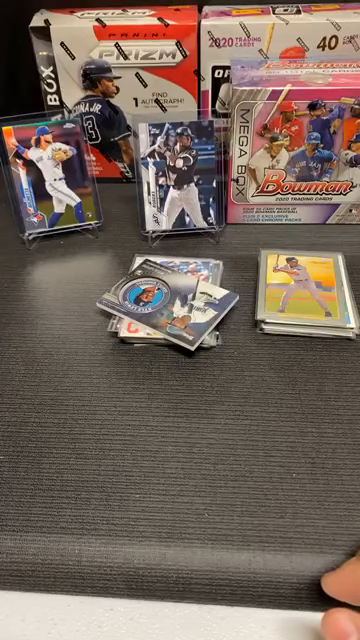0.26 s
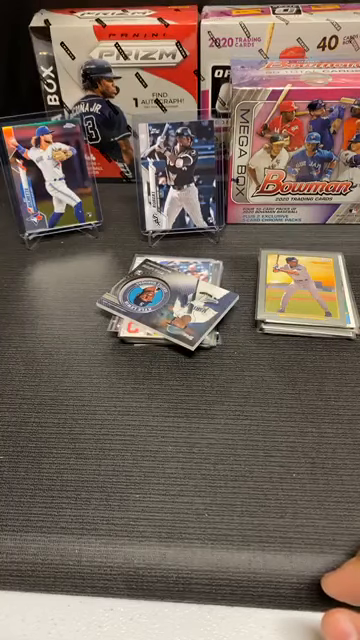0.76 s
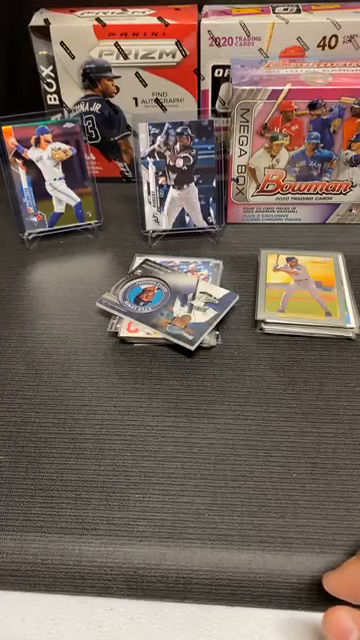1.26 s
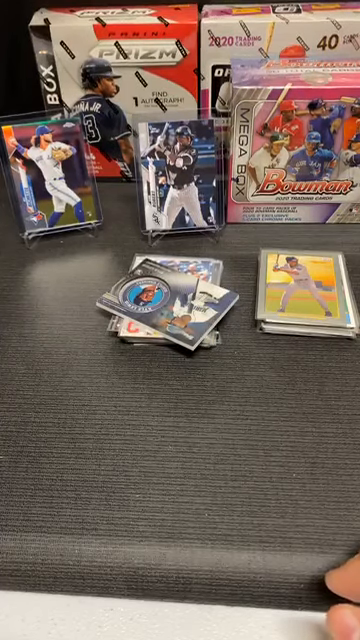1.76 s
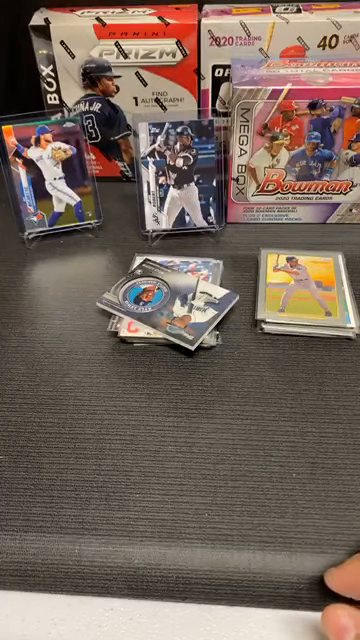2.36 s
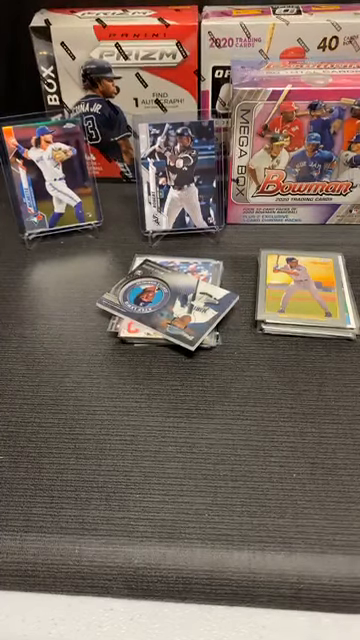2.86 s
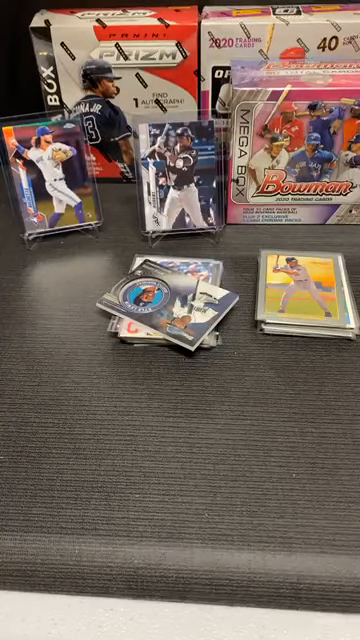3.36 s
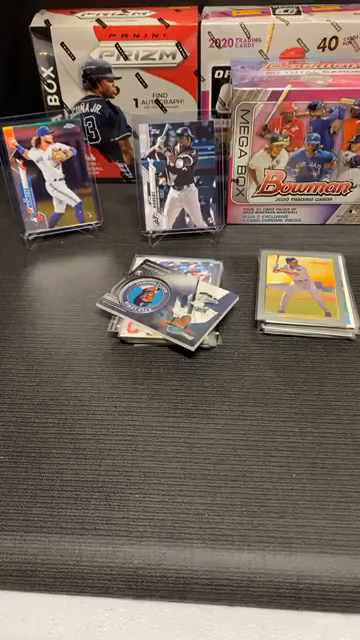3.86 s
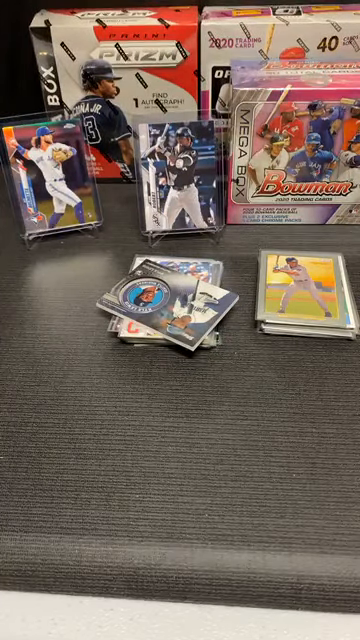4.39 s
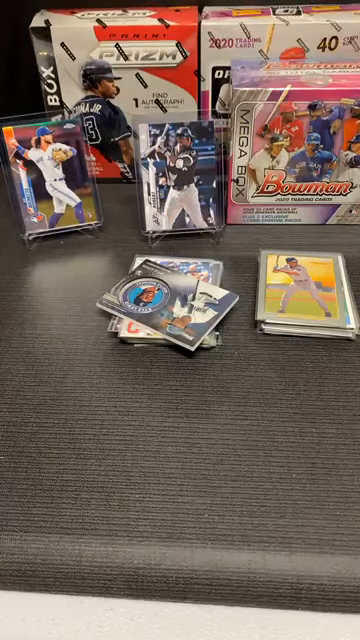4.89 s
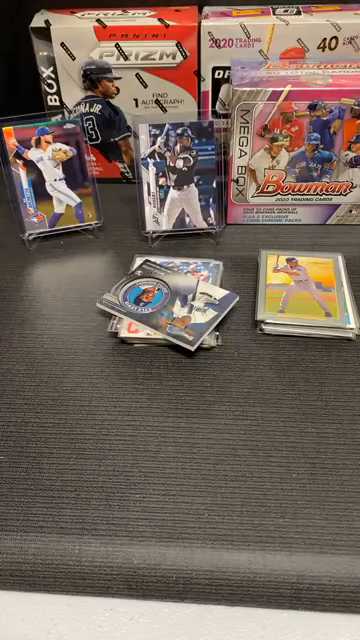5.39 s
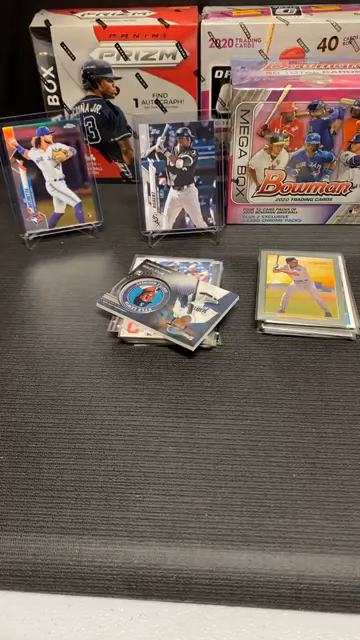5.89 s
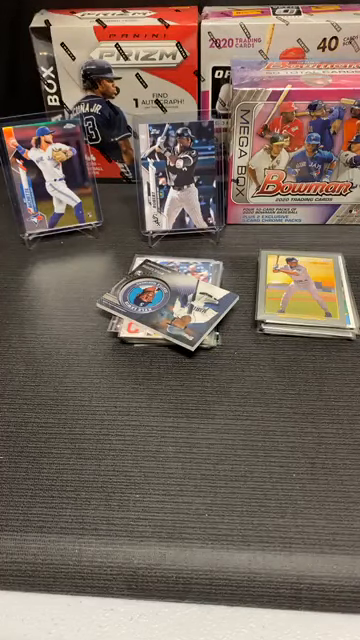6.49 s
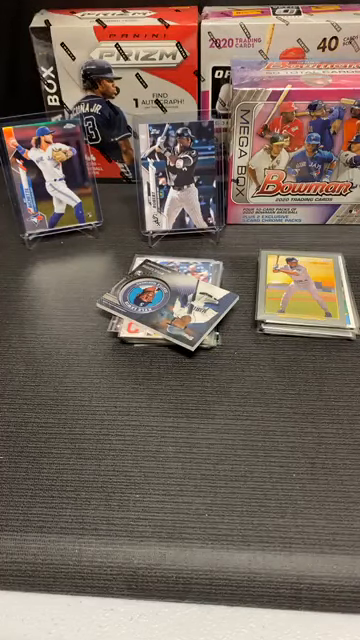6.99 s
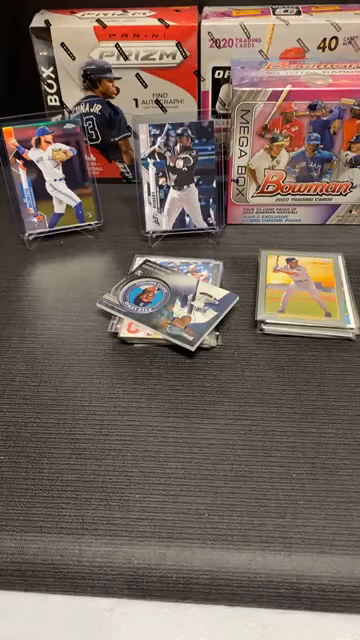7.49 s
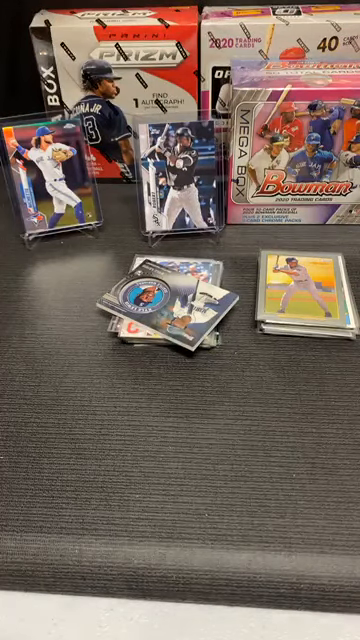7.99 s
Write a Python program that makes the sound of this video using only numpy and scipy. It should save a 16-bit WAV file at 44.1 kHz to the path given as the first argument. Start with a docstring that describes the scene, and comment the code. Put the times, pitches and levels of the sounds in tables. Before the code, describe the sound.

A small quiet room with a faint, bass-heavy hush and very short reflections, heard close. Almost immediately, at 0.07 s, a pack slaps onto the table: a sharp, bright clatter with a dull knock, dying quickly. Faint film hiss follows, and from 0.8 to 1.4 s something is shoved in short raspy, hollow scrapes with soft knocks. From about 1.5 to 2.9 s it is nearly silent, only tiny dry ticks and a soft low bump at 2.3. Around 3 s thin plastic starts rustling in short airy strokes. At 4.1 to 4.3 s comes the strongest crinkling, a dense run of bright snaps. Softer rubbing and crackles continue until a second cluster at 5.5 to 5.6 s, with a brief buzzy pop. Gentle sliding and scattered light snaps last to about 7.2 s, then a low bump at 7.4 and faint ticks fade away.

```python
"""Card into a plastic sleeve

Hands work a trading card into a thin plastic sleeve, at a table in a small quiet room.
The film rustles in filtered noise as it slides; its creases snap as short resonant pulses, singly and in runs.
Early on a pack slaps down as a burst of noise and something scrapes over the table; soft knocks ring its modes.
Short echoes of the room follow, well below the direct sound, and a low hush lies under everything."""
import sys
import numpy as np
from scipy import signal
from scipy.fft import rfft, irfft, next_fast_len
from scipy.io import wavfile
from scipy.ndimage import map_coordinates

SR = 44100
rng = np.random.default_rng(int(sys.argv[2]) if len(sys.argv) > 2 else 0)


def to_wav(sig):
    """Store sig (one row per channel, or 1-D mono) as 16-bit WAV at the path in sys.argv[1].

    Samples outside -1..1 are clipped; the rate is SR.
    """
    pcm = np.clip(np.atleast_2d(sig), -1, 1) * 32767
    pcm = np.round(pcm).astype(np.int16)
    wavfile.write(sys.argv[1], SR, pcm.T)  # frames by channels


N = 363825

# strokes of film over card and fingers:
# (start [s], length [s], relative treble sheen [dB], relative midrange rub [dB])
FILM_STROKES = [(0.0, 0.0076, -35.5, -44.5), (0.066, 0.032, -30, -35.5), (0.3, 0.061, -49, -61),
                (0.345, 0.063, -46.5, -55.5), (0.5, 0.25, -52, -67.5), (0.81, .1, -52.5, -59),
                (0.97, 0.088, -54.5, -51), (1.29, 0.16, -53, -50), (1.925, 0.043, -58.5, -65),
                (2.255, 0.039, -56.5, -64), (2.435, 0.037, -57, -62), (2.535, 0.046, -58.5, -69),
                (2.655, 0.026, -58.5, -81), (2.74, 0.067, -61.5, -80), (2.952, 0.014, -55, -57),
                (3.105, 0.092, -48, -56.5), (3.26, 0.073, -55, -62), (3.385, 0.089, -48, -52.5),
                (3.55, 0.097, -54.5, -60), (3.74, 0.055, -46, -59), (3.925, 0.0091, -40.5, -42.5),
                (3.97, 0.13, -49, -54.5), (4.085, 0.043, -43, -37.5), (4.228, 0.071, -44, -42.5),
                (4.33, 0.14, -65, -51.5), (4.445, 0.21, -45.5, -44), (4.71, 0.11, -51.5, -54),
                (4.92, 0.29, -47.5, -49.5), (5.22, 0.098, -63, -55.5), (5.355, 0.11, -49, -49),
                (5.555, 0.024, -42, -40.5), (5.77, 0.29, -56, -63.5), (6.015, 0.071, -43, -51),
                (6.15, 0.14, -46.5, -54), (6.4, .26, -47.5, -51), (6.82, 0.25, -53, -55.5),
                (7.12, 0.21, -63.5, -56), (7.365, .04, -52, -50.5), (7.625, 0.015, -56.5, -63),
                (7.79, 0.064, -61, -58.5), (8.1, 0.039, -57.5, -67)]
STROKE_ATTACK_S, STROKE_RELEASE_T60_S, STROKE_SAG_DB_PER_S = 0.0092, 0.22, 7.5
# faint rustle of the hands, rising and falling: (time [s], relative level [dB])
HAND_FIDGET = [(0, -59.5), (1.4, -58), (1.7, -67), (2.1, -73), (2.9, -66.5), (3.2, -57.5), (5.0, -53),
               (5.7, -57.5), (7.3, -57.5), (7.5, -67.5), (8.25, -60)]
FIDGET_RUB_DB = -4  # its midrange against its treble


def sliding():
    """Gains of the sheen and of the rub: strokes on top of a faint fidgeting that rises and falls."""
    sheen, rub = moves(FILM_STROKES, STROKE_ATTACK_S, STROKE_RELEASE_T60_S, STROKE_SAG_DB_PER_S)
    fidget, = curves(HAND_FIDGET)
    return np.hypot(sheen, amp(fidget)), np.hypot(rub, amp(fidget + FIDGET_RUB_DB))


# treble of the sliding film: (frequency [Hz], relative level [dB])
FILM_SHEEN = [(900, -40.5), (2000, -22), (3300, -2), (5000, 2.5), (7500, 4), (9500, -5), (12000, -11.5),
              (15500, -20)]
# midrange of fingers rubbing the film: (frequency [Hz], relative level [dB])
FINGER_RUB = [(90, -20), (200, -11.5), (380, -0.5), (800, -0.5), (1500, -3.5), (2300, -2.5), (3500, -8),
              (7000, -27.5)]
# extra top over the sheen: (time [s], relative level [dB])
TOP_AIR = [(0, -8), (0.4, -5), (1.0, -13), (2.0, -4), (3.1, -2.5), (4.0, -4), (4.4, -9), (5.0, -8),
           (6.7, -12), (7.3, -16), (7.65, -1), (7.85, -11)]
# brisker sliding hisses higher: dB of extra top per dB of sheen gain above BRISK_DB
AIR_GROWS, BRISK_DB = 0.22, -50.5


def rustle(sheen, rub, sheen_db, rub_db, air_db, slip_db, crackle_db, flutter_db):
    """Sliding film: a smooth hiss with slips and fine crackles on top, under an unsteady grip."""
    slipping = amp(slip_db) * slips(rate=500, spread_db=-0.5, life=0.0028)
    crackling = amp(crackle_db) * crackles(rate=1200, spread_db=3.5, centre_hz=3800, scatter=0.791, cycles=9.4)
    grain = slipping + crackling

    def friction(spectrum):
        """Hiss and grain through one spectrum, with its own flutter of level."""
        grip = amp(flutter_db * wobble(70))
        return grip * coloured(rng.standard_normal(N) + grain, spectrum)

    briskness_db = 20 * np.log10(sheen) - BRISK_DB
    air = curves(TOP_AIR)[0] + AIR_GROWS * briskness_db
    top = friction([(5000, -28.5), (9000, -3), (12000, -6.5), (15500, -9.5)])
    bright = friction(FILM_SHEEN) + amp(air + air_db) * top
    return amp(sheen_db) * sheen * bright + amp(rub_db) * rub * friction(FINGER_RUB)


# a crease running along the film, snap after snap:
# (start [s], length [s], gap between snaps [s], central relative level [dB], central pitch [Hz])
CREASE_RUNS = [(4.1143, .026, .0047, -13, 5170), (4.2476, .041, .0063, -23, 5800)]
# from snap to snap: share of the gap, dB, share of the pitch
RUN_JITTER, RUN_SCATTER_DB, RUN_PITCH_SCATTER = .18, 4.5, 0.084


def run_snaps():
    """Creases of a run snap at a slightly uneven pace: rows like those of single snaps."""
    rows = []
    for start, length, gap, db, hz in CREASE_RUNS:
        for k, (late, louder, higher) in enumerate(rng.standard_normal(size=(16, 3))):
            if k * gap < length:
                s = start + gap * (k + RUN_JITTER * late * (k > 0))  # the first is on time
                pitch = hz * np.exp(RUN_PITCH_SCATTER * higher)
                rows.append((s, db + RUN_SCATTER_DB * louder, pitch))
    return rows


# single creases snapping through: (time [s], relative level [dB], pitch of the buckling facet [Hz])
CREASE_SNAPS = [(0.0701, -13, 5040), (0.355, -41, 2510), (0.5054, -36.5, 6460), (0.6706, -37, 6760),
                (0.7313, -35, 3650), (1.46, -34, 7200), (1.586, -41, 3800), (1.842, -44, 7750),
                (2.3033, -41.5, 6140), (2.4479, -37, 6540), (2.57, -44, 5200), (2.962, -42, 2640),
                (3.0531, -36, 5000), (3.2025, -38, 6050), (3.2734, -36.5, 2840), (3.4019, -32.5, 6650),
                (3.5625, -38.5, 2370), (3.6005, -41, 2000), (3.9344, -24, 7800), (4.0895, -11, 4800),
                (4.093, -11.5, 5870), (4.0975, -9, 4700), (4.1066, -9.5, 4340), (4.2043, -22.5, 5800),
                (4.2389, -18.5, 4500), (4.2419, -13.5, 5300), (4.3024, -19, 5800), (4.3135, -18.5, 5800),
                (4.3548, -29, 2170), (4.4509, -32.5, 2800), (4.5743, -31, 2900), (4.644, -30.5, 4830),
                (4.7207, -32, 2000), (5.498, -25, 3580), (5.5165, -19, 2860), (5.5383, -20.5, 5400),
                (5.548, -15, 5300), (5.5651, -14.5, 4600), (5.5791, -25, 1470), (5.5909, -21, 1240),
                (5.6745, -41, 1400), (5.7166, -38.5, 1480), (5.7918, -36, 6540), (6.1426, -28.5, 3800),
                (6.2713, -30, 4560), (6.2788, -33, 3300), (6.3676, -36.5, 5150), (6.4134, -30.5, 3800),
                (6.4924, -30, 3160), (6.6045, -30.5, 4200), (6.8234, -33.5, 3800), (6.8849, -37.5, 5970),
                (7.0449, -29.5, 11000), (7.634, -40.5, 9900)]
# harder snaps are drier: t60 of the crack at a middling level, and the rise in level that halves it
CRACK_T60_S, MIDDLING_DB, HALVING_DB = 0.011, -25, 18.5


def snaps(flip_db, crack_db, skirt_db, shiver_db, shiver_t60, cut_share):
    """A facet flips with a short resonant pulse; the jolt crackles on through the film."""
    out, t = np.zeros(N), np.arange(SR // 20) / SR
    click = 1. * (t == 0)

    def per_ms(x):
        """Scale so that all the energy, packed into 1 ms, has rms 1."""
        return x * np.sqrt(SR / 1000 / np.sum(x ** 2))

    for s, db, hz in [*CREASE_SNAPS, *run_snaps()]:
        t60 = CRACK_T60_S * .5 ** ((db - MIDDLING_DB) / HALVING_DB)
        flip = filtered(click, lambda f: resonance(f, hz, q=1.1) * resonance(f, .85 * hz, q=1.3))
        onset = 1 - np.exp(-t * hz)
        decay = fade(t, t60) + amp(shiver_db) * fade(t, shiver_t60)
        jolt = rng.standard_normal(len(t)) * onset * decay
        # the crackle centres on the facet's pitch, with a weak, wide skirt
        crack = filtered(jolt, lambda f: resonance(f, hz, q=.7) ** 2 + amp(skirt_db) * resonance(f, hz, q=.08))
        snap = amp(db + flip_db) * per_ms(flip) + amp(db + crack_db) * per_ms(crack)
        # so small a facet radiates little far below its pitch
        add(out, s, filtered(snap, lambda f: low_cut(f, hz=cut_share * hz)))
    return out


# stray ticks of the film: (frequency [Hz], relative level [dB])
TICK_SPECTRUM = [(600, -16), (1500, -4), (3000, -2.5), (7000, -0.5), (10000, -9), (15500, -13)]


def ticks(sheen, rub, db, press_db, follow):
    """Stray creases give way with tiny dry clicks, even under a light touch; duller ones under the fingers."""
    free = coloured(slips(rate=42, spread_db=2.0, life=0.0076), TICK_SPECTRUM)
    dull = [(300, -14), (900, -3), (2000, -1), (3500, -3), (8000, -19.5)]
    pressed = coloured(slips(rate=40, spread_db=2.5, life=0.012), dull)
    # with follow below 1, free ticks fade less than the sheen does
    return amp(db) * sheen ** follow * free + amp(press_db) * rub * pressed


def pop_open(s, db, hz, q, t60):
    """The mouth of the sleeve springs open and its wall buzzes briefly."""
    out, t = np.zeros(N), np.arange(SR // 10) / SR
    decay = fade(t, t60 / 10) + amp(-23.0) * fade(t, t60)
    shake = rng.standard_normal(len(t)) * decay
    buzz = filtered(shake, lambda f: resonance(f, hz, q) ** 2)
    add(out, s, amp(db) * buzz / np.std(buzz[:SR // 200]))  # level over the first 5 ms
    return out


def squeak(s, length, db, hz, q):
    """Film dragged tight over the card sings briefly in a narrow band."""
    out, t = np.zeros(N), np.arange(SR // 5) / SR
    tone = unit(filtered(rng.standard_normal(len(t)), lambda f: resonance(f, hz, q) ** 2))
    swell = np.sin(np.pi * np.minimum(t / length, 1))
    add(out, s, amp(db) * tone * swell)
    return out


# the pack landing on the table: (frequency [Hz], relative level [dB])
SLAP_SPECTRUM = [(150, -17), (300, -4), (1000, -24), (1700, -4), (2300, 3), (3400, 2), (4100, -14.5),
                 (5700, 5.5), (7700, -2), (9800, -3), (11000, -13.5), (15500, -10)]


def slap(s, db, t60):
    """A pack of cards lands flat: a sharp onset and a dense, quickly dying clatter."""
    out, t = np.zeros(N), np.arange(SR // 5) / SR
    clatter = coloured(rng.standard_normal(len(t)), SLAP_SPECTRUM)
    add(out, s, amp(db) * clatter * fade(t, t60))
    return out


# blows on the table: (time [s], relative level [dB], contact brightness [Hz], t60 of the contact [s])
TABLE_KNOCKS = [(0.071, -26, 550, 0.045), (0.112, -36, 800, 0.16), (0.833, -39, 1500, 0.069),
                (1.032, -38.5, 1800, 0.057), (1.059, -39.5, 1800, 0.032), (1.145, -45.5, 1100, 0.12),
                (1.305, -43.5, 800, 0.2), (3.441, -42, 2200, 0.04), (4.096, -39, 2000, 0.047),
                (4.225, -46.5, 600, 0.025), (5.568, -44.5, 700, 0.065), (7.395, -47, 280, 0.03),
                (7.736, -50.5, 1700, 0.08)]
# soft, low bumps of hand and table: (time [s], relative level [dB], pitch [Hz], t60 [s])
LOW_BUMPS = [(2.305, -46.5, 113, 0.14), (7.396, -40, 280, 0.022), (7.406, -52, 66, 0.31)]
# shoves of something over the table:
# (start [s], length [s], relative hollow body [dB], relative rasp [dB])
TABLE_SHOVES = [(0.78, 0.043, -55, -50.5), (0.83, 0.029, -45.5, -51), (0.88, 0.38, -59, -55),
                (1.02, 0.049, -43.5, -41), (1.14, 0.19, -59, -71), (1.275, 0.15, -42.5, -49)]
SHOVE_ATTACK_S, SHOVE_RELEASE_T60_S, SHOVE_SAG_DB_PER_S = 0.02, 0.11, 12
# rasp of the dragged edge: (frequency [Hz], relative level [dB])
EDGE_RASP = [(700, -11), (1150, -4), (1390, 8.5), (1700, -10), (2350, -3), (2850, -20), (4000, -18),
             (8000, -38)]


def table(knock_db, bump_db, drag_db, rasp_db):
    """Knocks and a juddering drag ring the table top; soft contacts reach mostly its low modes."""
    out, t = np.zeros(N), np.arange(SR // 4) / SR
    for s, db, hz, t60 in TABLE_KNOCKS:
        contact = rng.standard_normal(len(t)) * fade(t, t60)
        blow = filtered(contact, lambda f: table_top(f) * low_cut(f, hz=153) / (1 + 1j * f / hz) ** 2)
        add(out, s, amp(db + knock_db) * blow / np.std(blow[:SR // 50]))  # level over the first 20 ms
    for s, db, hz, t60 in LOW_BUMPS:
        onset = 1 - np.exp(-t * hz * 2)
        add(out, s, amp(db + bump_db) * np.sin(2 * np.pi * hz * t) * fade(t, t60) * onset)
    body, rasp = moves(TABLE_SHOVES, SHOVE_ATTACK_S, SHOVE_RELEASE_T60_S, SHOVE_SAG_DB_PER_S)
    judder = slips(rate=710, spread_db=3.0, life=0.016)
    hollow = unit(filtered(judder, lambda f: table_top(f) * low_cut(f, hz=182) / (1 + 1j * f / 750) ** 2))
    return out + amp(drag_db) * body * hollow + amp(rasp_db) * rasp * coloured(judder, EDGE_RASP)


# broad modes of the table top: (frequency [Hz], width [Hz], relative level [dB])
TABLE_MODES = [(209, 62, -4.5), (333, 62, 1), (578, 123, 2), (720, 38, -10), (854, 210, -4.5),
               (1170, 100, -9.5), (1410, 210, -6), (2410, 270, -16), (2800, 230, -27)]


def table_top(f):
    """Response of the table's broad modes, summed with alternating sign."""
    total = 0
    for k, (centre, width, db) in enumerate(TABLE_MODES):
        mode = 1j * f * width / (centre * centre - f * f + 1j * f * width)
        total = total + (-1) ** k * amp(db) * mode
    return total


# how long the small room rings: (frequency [Hz], t60 [s])
ROOM_DECAY = [(150, 0.24), (1000, 0.17), (6000, 0.25), (15000, 0.27)]


def room(x, wet_db):
    """Nearby walls answer after a short gap; each frequency dies at its own speed."""
    hz, t, z = signal.stft(rng.standard_normal(SR // 2), SR, nperseg=256)
    decay = fade(t, along(ROOM_DECAY, hz)[:, None])
    tail = signal.istft(z * decay, SR, nperseg=256)[1]
    tail = np.pad(tail / np.linalg.norm(tail), (SR // 400, 0))  # 2.5 ms gap
    return x + amp(wet_db) * signal.fftconvolve(x, tail)[:N]


# low background of the quiet room: (frequency [Hz], relative level [dB])
ROOM_HUSH = [(20, 4), (40, -24), (65, 5), (110, 2.5), (170, -0.5), (330, -5), (600, -12.5), (1500, -22),
             (5000, -27.5), (15000, -30.5)]


def quiet_hush(db):
    """Steady noise, heaviest in the bass, stands for the background of the room."""
    return amp(db) * coloured(rng.standard_normal(N), ROOM_HUSH)


def slips(rate, spread_db, life):
    """Friction: tiny slips of unequal size, rate a second, each a puff of noise with t60 life."""
    happens = rng.random(N) < rate / SR
    sizes = amp(spread_db * np.minimum(rng.standard_exponential(N), 4.5)) * happens
    power = signal.lfilter([1], [1, -fade(2 / SR, life)], sizes ** 2)
    return unit(np.sqrt(power) * rng.standard_normal(N))


def crackles(rate, spread_db, centre_hz, scatter, cycles):
    """Countless tiny facets flip, each ringing briefly at its own pitch."""
    count = int(rate * N / SR)
    start = rng.integers(0, N, (count, 1))
    hz = np.clip(centre_hz * np.exp(scatter * rng.standard_normal((count, 1))), 500, 15000)
    size = amp(spread_db * np.minimum(rng.standard_exponential((count, 1)), np.pi))
    k = np.arange(SR // 200)
    tone = np.sin(2 * np.pi * hz * k / SR)
    rings = size * hz ** 0.63 * tone * fade(k / SR, cycles / hz)
    return unit(np.bincount((start + k).ravel(), rings.ravel(), N)[:N])


def moves(rows, attack_s, release_t60, sag_db_per_s):
    """Gains for the two level columns: each move of the hand swells, sags while it lasts and dies away."""
    power, t = np.zeros((2, N)), np.arange(SR) / SR
    for s, length, *levels in rows:
        swell = np.minimum(t / attack_s, 1)
        hold = amp(-sag_db_per_s * (np.minimum(t, length) - length / 2))
        shape = swell * hold * fade(np.maximum(t - length, 0), release_t60)
        for track, db in zip(power, levels):
            add(track, s, (amp(db) * shape) ** 2)
    return np.sqrt(power)


def amp(db):
    """Decibels to gain."""
    return 10 ** (np.asarray(db) / 20)


def unit(x):
    """Scale to rms 1."""
    return x / np.sqrt(np.mean(x ** 2) + 1e-20)


def along(points, hz):
    """(Hz, value) points read on a log axis."""
    f, v = np.transpose(points)
    return np.interp(np.log(hz + 1), np.log(f + 1), v)


def curves(rows):
    """One value per sample for each column after the time."""
    s, *cols = np.transpose(rows)
    return [np.interp(np.arange(N) / SR, s, c) for c in cols]


def wobble(rate):
    """A smooth random curve, rate knots a second."""
    knots = rng.standard_normal(int(N * rate / SR) + 4)
    return map_coordinates(knots, [np.arange(N) * rate / SR])


def filtered(x, response):
    """x times a response of frequency."""
    m = next_fast_len(2 * len(x))
    return irfft(rfft(x, m) * response(np.fft.rfftfreq(m, 1 / SR)), m)[:len(x)]


def coloured(x, spectrum):
    """x weighted by a spectrum, at rms 1."""
    return unit(filtered(x, lambda hz: amp(along(spectrum, hz))))


def resonance(f, hz, q):
    """Causal band-pass of unit gain at hz."""
    return 1 / (1 + 1j * q * (f / hz - hz / (f + 1e-9)))


def low_cut(f, hz):
    """Steep causal high-pass."""
    return ((f / hz) ** 2 / (1 + np.sqrt(2) * 1j * f / hz - (f / hz) ** 2)) ** 2


def fade(t, t60):
    """Exponential decay by 60 dB in t60."""
    return np.exp(-np.log(1000) * t / t60)


def add(track, s, sound):
    """Mix a sound in at time s."""
    part = track[max(round(s * SR), 0):][:len(sound)]
    part += sound[:len(part)]


def scene():
    """Sleeve, pack and table in the room, over its low hush."""
    sheen, rub = sliding()
    sleeve = rustle(sheen, rub, sheen_db=-6.0, rub_db=-4, air_db=-1, slip_db=-7.5, crackle_db=-6.5, flutter_db=2.95)
    sleeve += snaps(flip_db=-5.5, crack_db=-3.5, skirt_db=-7.5, shiver_db=-17, shiver_t60=0.068, cut_share=0.24)
    sleeve += ticks(sheen, rub, db=-22, press_db=-7.5, follow=0.73)
    sleeve += pop_open(s=5.5172, db=-25, hz=3080, q=2.6, t60=0.083)
    sleeve += squeak(s=3.97, length=.07, db=-50, hz=3680, q=7)
    pack = slap(s=0.0697, db=-17.5, t60=0.069)
    desk = table(knock_db=-2.0, bump_db=2.5, drag_db=-1.5, rasp_db=-1.5)
    return room(sleeve + pack + desk, wet_db=-10)[None] + quiet_hush(db=-64.5)


TOP_HZ = 15900  # upper edge of the sound


def record(dry):
    """A soft limiter rounds off the highest peaks; the deepest bass is cut; nothing sounds above about 16 kHz."""
    rounded = dry[0] / (1 + np.abs(dry[0] / .65) ** 4) ** (1 / 4)
    return filtered(rounded, lambda f: low_cut(f, hz=32) / (1 + (f / TOP_HZ) ** 160))[None]


dry = scene()
out = record(dry)
to_wav(out)
```